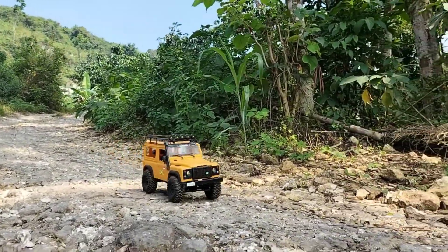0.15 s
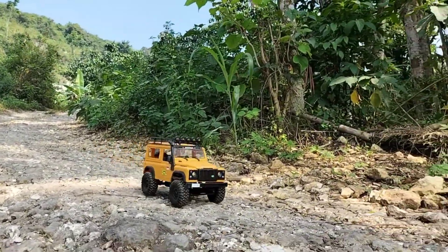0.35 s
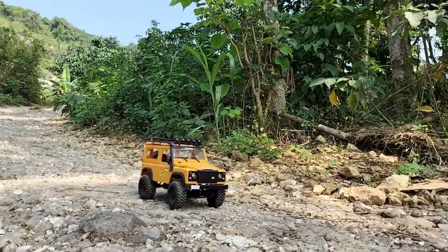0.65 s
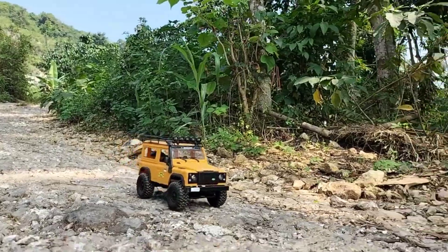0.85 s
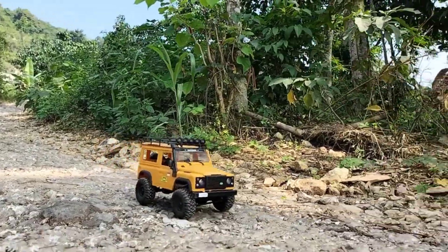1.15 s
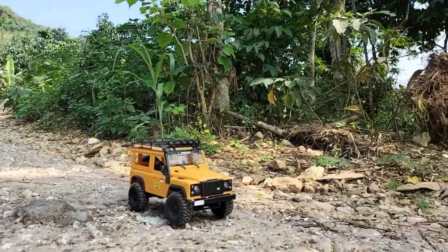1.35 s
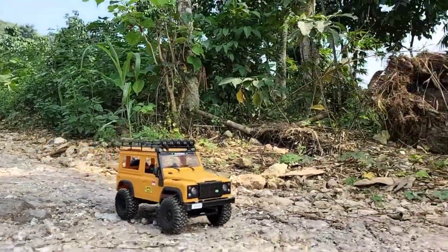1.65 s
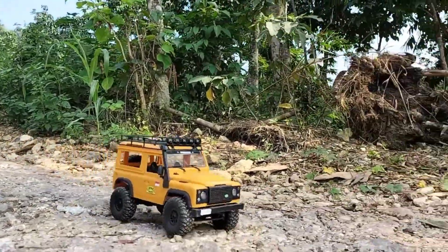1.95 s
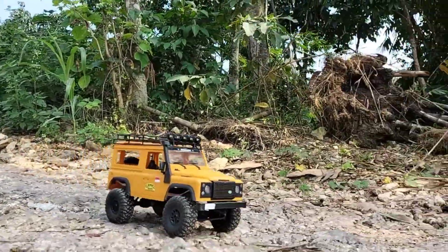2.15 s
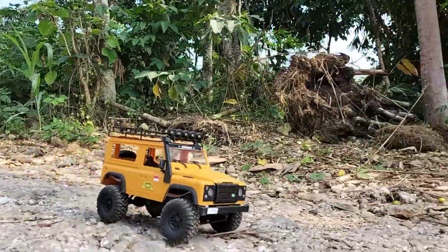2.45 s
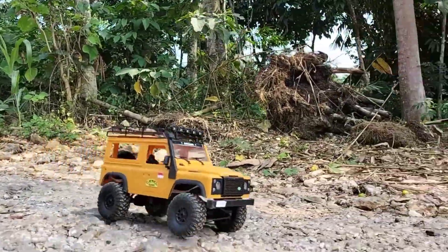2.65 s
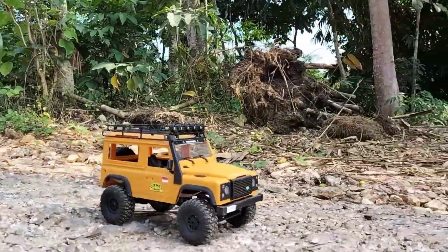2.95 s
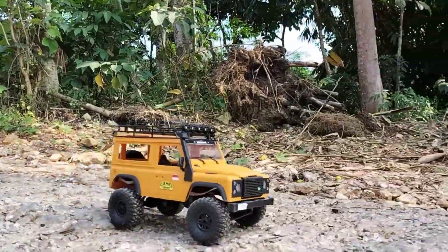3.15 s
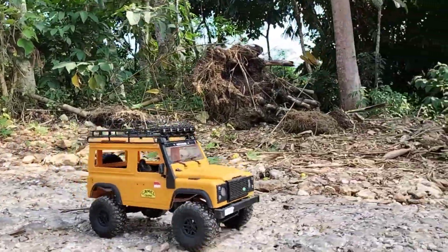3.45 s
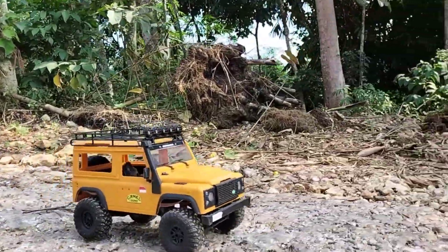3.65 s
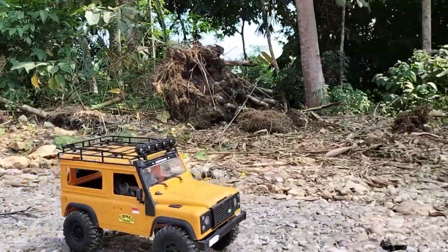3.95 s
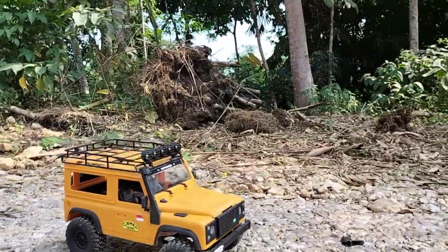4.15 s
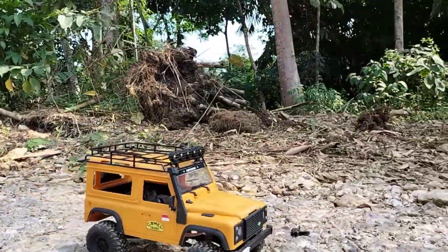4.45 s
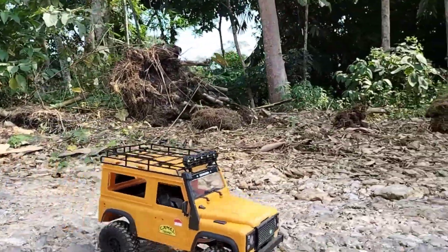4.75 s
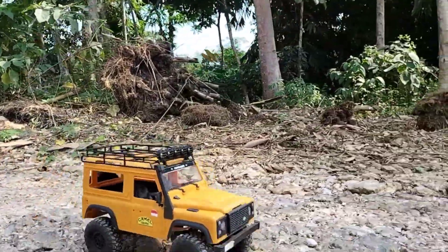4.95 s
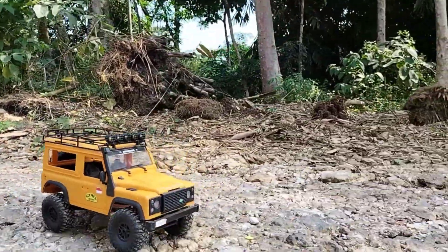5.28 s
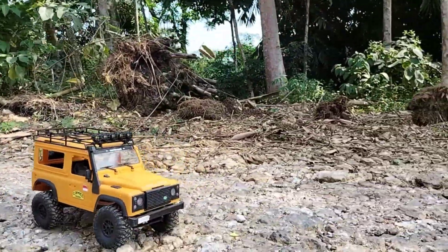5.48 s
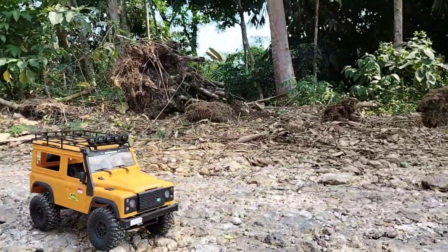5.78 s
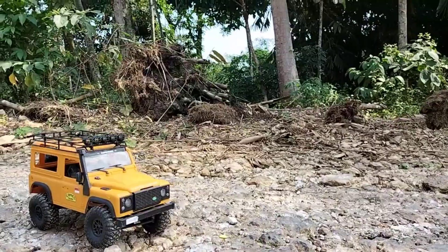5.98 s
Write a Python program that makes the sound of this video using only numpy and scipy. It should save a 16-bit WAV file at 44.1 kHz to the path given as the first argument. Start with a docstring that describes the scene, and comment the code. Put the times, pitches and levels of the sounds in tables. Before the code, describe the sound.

Open air on a rocky path, heard from about a metre away. A fast, high cricket trill runs throughout, rising and dipping in loudness and strongest around 2.7 s, joined by a thin cicada whistle in phrases, a fine buzzing shimmer and faint distant trills. From the start a small remote-control car crawls in short, uneven throttle bursts: dry gravel crunch, sandy grit and a light, high gear rasp. A cluster of hard stone snaps stands out at 0.5 s; smaller clicks follow around 2.5, 3.4 and 4.6 s, with dull pebble knocks and soft hollow body bumps between. The car is nearest around 4.1 s. A last burst of sharp clicks and crunch comes at 4.9-5.0 s, then the gears fall silent and gravel settles by 5.3 s. Insects, faint air, a tiny breeze puff and very faint pebble ticks remain until 6.1 s.

```python
"""A small remote-control car crawls over loose gravel and stops after five seconds.
Tyres: random grains, filtered into crunch and grit; gearbox: filtered grains that rasp with the throttle.
Struck stones, tipping pebbles and the hollow body ring as short decaying modes.
Behind: crickets built from pitch-bent wing strokes, a swaying cicada whistle, two far trills and faint
outdoor air with a hum, a flutter and puffs of breeze."""
import sys
import numpy as np
from scipy import signal
from scipy.fft import rfft, irfft, next_fast_len
from scipy.io import wavfile
from scipy.ndimage import uniform_filter1d, map_coordinates

SR = 44100
rng = np.random.default_rng(int(sys.argv[2]) if len(sys.argv) > 2 else 0)


def transcribe(signal):
    """Save signal, clipped to [-1, 1], as a 16-bit WAV file at the path in sys.argv[1]."""
    frames = np.atleast_2d(signal).T
    limited = np.clip(frames, -1, 1)
    pcm = np.round(limited * 32767).astype(np.int16)
    wavfile.write(sys.argv[1], SR, pcm)


N = 269892

# pushes of the throttle: start/s, end/s, effort/dB
THROTTLE_PUSHES = [(0.041, 0.108, -1.5), (.17, 0.198, -2.5), (.3, 0.576, -4), (0.664, 0.78, -4),
                   (0.809, 0.851, 1), (1.025, 1.053, 1), (1.093, 1.157, 1), (1.219, 1.45, -1.5),
                   (1.54, 1.598, 0), (1.681, 1.876, 0), (1.956, 2.277, 1), (2.331, 2.564, 0),
                   (2.63, 2.795, 0.5), (2.833, 2.934, -4), (3.036, 3.239, 0), (3.306, 3.328, 4.5),
                   (3.376, 3.417, -2), (3.616, 3.718, 0.5), (3.779, 3.9, -1.5), (4.049, 4.35, .5),
                   (4.4, 4.474, 2), (4.51, 4.621, 0), (4.779, 4.9, -0.5), (4.942, 5.003, 0.5)]
# loose gravel giving way under a tyre: middle/s, half length/s, crunch level/dB, grit level/dB
GRAVEL_SLIDES = [(0.254, 0.02, -54, -50), (0.332, 0.025, -50.5, -66), (0.513, 0.025, -46.5, -45.5),
                 (0.603, 0.026, -47.5, -58), (0.977, 0.027, -53, -53.5), (1.247, 0.026, -49, -57.5),
                 (1.337, 0.01, -43.5, -51), (1.476, 0.028, -49, -59), (2.46, 0.085, -50, -47),
                 (2.741, 0.015, -44.5, -48.5), (3.325, .015, -51, -44.5), (3.64, 0.046, -54, -48),
                 (4.172, 0.043, -53.5, -48.5), (4.285, 0.034, -52.5, -69), (4.581, 0.05, -49, -46.5),
                 (4.976, .035, -43.5, -52)]
# spectral shapes: f/Hz, relative density/dB
CRUNCH_SHAPE = [(41, -41), (70, -25), (124, -25.5), (246, -5), (329, -9), (365, -7), (435, -4), (674, -4.5),
                (943, 2.5), (1190, -5.5), (1820, -1.5), (2020, -12), (2300, -9.5), (2990, -16),
                (5060, -120)]
GRIT_SHAPE = [(1500, -39.5), (2100, 1), (2800, 1.5), (3300, 2.5), (4100, 1), (4600, 1.5), (5400, -3),
              (7000, -27), (9000, -36.5), (12000, -28), (15500, -35)]
GEAR_SHAPE = [(4800, -37), (5500, -8), (6000, 2.5), (6450, -5), (7100, 3.5), (7700, -2.5), (8300, -14.5),
              (9300, -29), (12000, -48), (15500, -44.5)]
AIR_SHAPE = [(25, -10), (60, -2.5), (150, 5.5), (300, 2), (600, -3.5), (1700, -7), (2100, -12.5),
             (2700, -7), (4300, -3.5), (5200, -30), (5900, -12.5), (6600, -8), (8000, -18.5), (9300, -30),
             (12000, -32), (15500, -41)]
# cricket loudness: t/s, level/dB
TRILL_LEVEL = [(0.0, -38.5), (0.63, -42.5), (0.66, -52), (0.78, -43.5), (0.87, -51.5), (1.03, -40.5),
               (1.15, -45), (1.26, -38), (1.8, -49.5), (2.09, -37.5), (2.29, -42), (2.38, -36.5),
               (2.7, -33), (2.8, -41.5), (3.21, -48.5), (3.52, -35.5), (3.58, -41.5), (4.04, -42),
               (4.09, -47.5), (4.28, -39.5), (4.38, -45), (6.1, -41.5)]
# cricket pitch: t/s, f/Hz
TRILL_PITCH_HZ = [(0, 4753), (.9, 4735), (1.38, 4836), (1.6, 4730), (2.2, 4686), (2.7, 4782), (3.1, 4732),
                  (3.8, 4800), (4.25, 4743), (4.9, 4680), (5.17, 4766), (6.12, 4748)]
# cicada phrases: start/s, end/s, whistle level/dB
CICADA_PHRASES = [(0.043, .15, -53), (0.267, 0.404, -44.5), (.55, 1.024, -54), (1.298, 2.05, -61),
                  (2.144, 2.962, -47.5), (3.08, 3.254, -54.5), (3.36, 3.813, -48.5), (3.943, 4.253, -53),
                  (4.34, 4.563, -48.5), (4.86, 5.062, -55.5), (5.443, 5.718, -49.5), (5.8, 5.9, -54.5),
                  (5.99, 6.12, -48)]
# faint hum: f/Hz, level/dB
HUM_TONES = [(603, -72.5), (940, -81), (1065, -81.5), (1470, -76.5)]
# breeze: middle/s, level/dB, half length/s
BREEZE_PUFFS = [(3.87, -65, 0.019), (4.024, -65, .03), (5.31, -68, 0.042), (5.464, -57, 0.012)]
# hard stone contacts: t/s, relative level/dB, low-mode boost/dB, high-mode boost/dB, pitch/Hz
STONE_CLICKS = [(0.1766,-38.5,-1.5,3.5,3450),(0.2984,-31.5,-3.5,-11,3550),(0.479,-27.5,-16,-20,3500),(0.489,-28,-9,-20,3350),(0.5003,-16.5,-5,-16,3470),(0.5058,-19,-16.5,-17,3370),(0.511,-8,-16,-22,3320),(0.528,-11.5,-9.5,-22,3400),(1.2309,-42,5,0.5,3440),(2.284,-42.5,-9,6,3400),(2.4394,-30,3.5,3.5,3450),(2.4635,-39,-10,-3,3560),(2.4846,-30,0,-2.5,3400),(2.5216,-22.5,-14,-7.5,3200),(2.539,-24.5,-5,-14.5,3600),(2.75,-25.5,-7,-4,3050),(3.2254,-34.5,-9,-10,3350),(3.297,-26,-10,2,3690),(3.3845,-25,-6,-9.5,3150),(3.6176,-26.5,0,-9.5,3430),(3.635,-35,4,-12,3380),(3.675,-31.5,1,-6.5,3320),(3.987,-38,-15,-10,3430),(4.213,-33.5,2,0,3600),(4.577,-27,-9,-15,3160),(4.585,-20.5,-7.5,-11,3490),(4.932,-27.5,-26,-18.5,3800),(4.944,-16,-16,-21,4160),(4.952,-27,-6,-14,3850),(4.997,-24,-11,-24.5,3980),(5.093,-38,-6,-9,3230)]
# modes of a stone of pitch 3400 Hz: f/Hz, relative level/dB, t60/s
STONE_MODES = [(1190, 6, 0.005), (1362, 3.5, 0.013), (1866, -4, 0.012), (2770, -2, 0.0092),
               (3210, 3, 0.0032), (3820, 3, 0.0072), (6060, 6.5, 0.0058), (6600, 0, 0.016),
               (7360, 0, 0.011)]
# hollow body bumping on its springs: t/s, relative level/dB, f/Hz
BODY_BUMPS = [(0.341,-41.5,490),(0.528,-40,220),(1.245,-38,480),(1.327,-41,417),(1.486,-40,392),(2.115,-41.5,440),(2.723,-42.5,420),(2.854,-40.5,420),(3.224,-38.5,436),(4.143,-40,488),(4.25,-41,520),(4.94,-35.5,376),(4.958,-40.5,435)]
# pebbles tipping under a tyre: t/s, relative level/dB, f/Hz
PEBBLE_KNOCKS = [(0.675,-33,1120),(0.778,-36,1310),(0.876,-30,1050),(1.24,-39,990),(1.584,-39.5,1480),(1.621,-39,1030),(1.707,-33,1030),(2.409,-38,910),(2.537,-37,1010),(3.384,-25,973),(3.389,-31.5,1090),(3.599,-33.5,1320),(3.617,-29,1100),(3.636,-31,1160),(4.467,-32,1000),(4.606,-33,1100),(4.629,-31.5,910),(4.952,-31,790),(4.961,-31,860),(5.212,-44.5,950),(5.694,-47,820)]

SPIN_UP_S, SPIN_DOWN_S, COAST_DB = 0.015, 0.032, -10.5  # motor takes the load, lets go, idles
STOP_S, GRAVEL_SETTLE_S, GEARS_OFF_S = 4.99, 0.35, 0.07  # gears fall silent sooner than gravel
NEAR_S, NEAR_M, SPEED_M_PER_S = 4.13, 1, 0.28  # closest approach to the listener
CRUNCH_DB, GRIT_DB, RASP_DB = -52, -51.5, -50  # at 0 dB effort and closest approach
CRUNCH_DB_PER_EFFORT_DB, GRIT_DB_PER_EFFORT_DB = 0.45, 0.72
PATCH_SAMPLES = 768
STROKES_PER_S, SLOWING_PER_S2 = 49.6, 0.42  # wings slowly tire
WING_HZ = 4752
WHISTLE_RISE_S, WHISTLE_FALL_S, WHISTLE_REST_DB = 0.1, 0.096, -67.5  # rest: soft held note
SWAY_HZ, SWAY_DEPTH_HZ, SWAY_PERIOD_S, SWAY_TOP_S = 3543, 19, 1.46, 1.2
SHIMMER_DB, SHIMMER_FADE_DB_PER_S = -64, 0.75  # level at t = 0
TOP_HZ = 15480


def amp(db):
    """Decibels to gain."""
    return 10 ** (np.asarray(db) / 20)


def unit(x):
    """Scale to rms 1."""
    return x / np.sqrt(np.mean(x ** 2) + 1e-20)


def curve(rows):
    """Interpolate (t/s, value) rows to one value per sample."""
    s, values = np.transpose(rows)
    return np.interp(np.arange(N) / SR, s, values)


def wobble(rate):
    """Smooth random curve, rate knots a second."""
    knots = rng.standard_normal(int(N * rate / SR) + 4)
    return map_coordinates(knots, [np.arange(N) * rate / SR])


def turns(hz):
    """Cycles completed at a steady or moving frequency."""
    return np.cumsum(hz * np.ones(N)) / SR


def held(start, end, rise, fall):
    """Rise to 1 by start, hold until end, fall back to 0."""
    end = max(start, end)
    return np.interp(np.arange(N) / SR, [start - rise, start, end, end + fall], [0, 1, 1, 0])


def swell(middle, half_length):
    """Gaussian rise and fall; half_length is its standard deviation."""
    return np.exp(-0.5 * ((np.arange(N) / SR - middle) / half_length) ** 2)


def band_noise(count, low_hz, high_hz):
    """White noise through a second-order-prototype band-pass."""
    return signal.lfilter(*signal.butter(2, [low_hz, high_hz], "band", fs=SR), rng.standard_normal(count))


def coloured(x, points):
    """Filter x causally (minimum phase) to a (f/Hz, dB) shape, at rms 1."""
    m = 2 * next_fast_len(N // 2 + SR // 4)
    f, db = np.transpose(points)
    shape_db = np.interp(np.log(np.fft.rfftfreq(m, 1 / SR) + 1), np.log(f), db)
    # fold the cepstrum to positive time
    cepstrum = irfft(np.log(amp(shape_db)), m)
    cepstrum[1:m // 2] *= 2
    cepstrum[m // 2 + 1:] = 0
    response = np.exp(rfft(cepstrum))
    return unit(irfft(rfft(x, m) * response, m)[:N])


def grains(rate, spread_db):
    """Random tiny impacts of uneven size, rate a second, at rms 1."""
    size = amp(spread_db * np.clip(rng.standard_normal(N), -2, 2))
    sign = rng.choice([-1, 1], N)
    return unit(size * sign * (rng.random(N) < rate / SR))


def patchy(x, depth_db):
    """Every few milliseconds other stones or teeth ring, each with its own resonances."""
    z = signal.stft(x, nperseg=PATCH_SAMPLES)[2]
    field = uniform_filter1d(rng.standard_normal(z.shape), 3, 0)
    field = uniform_filter1d(field, 2, 1)
    gain = amp(depth_db * np.clip(unit(field), -2, 2))
    return signal.istft(z * gain, nperseg=PATCH_SAMPLES)[1][:N]


def add(track, s, sound):
    """Mix a sound in at time s."""
    part = track[max(round(s * SR), 0):][:len(sound)]
    part += sound[:len(part)]


def drive():
    """Gains of crunch, grit and rasp: throttle and distance set all three; slides add to crunch and grit."""
    t = np.arange(N) / SR
    pushes = [amp(db) * held(start, end, SPIN_UP_S, SPIN_DOWN_S) for start, end, db in THROTTLE_PUSHES]
    effort = np.maximum(np.max(pushes, axis=0), amp(COAST_DB))
    nearness = NEAR_M / np.hypot(NEAR_M, SPEED_M_PER_S * (t - NEAR_S))
    rolling = nearness * held(0, STOP_S, SPIN_UP_S, GRAVEL_SETTLE_S)
    crunch_slides = sum(amp(db) * swell(s, length) for s, length, db, _ in GRAVEL_SLIDES)
    grit_slides = sum(amp(db) * swell(s, length) for s, length, _, db in GRAVEL_SLIDES)
    crunch = amp(CRUNCH_DB) * rolling * effort ** CRUNCH_DB_PER_EFFORT_DB
    grit = amp(GRIT_DB) * rolling * effort ** GRIT_DB_PER_EFFORT_DB
    rasp = amp(RASP_DB) * rolling * effort * held(0, STOP_S, SPIN_UP_S, GEARS_OFF_S)
    return np.hypot(crunch, crunch_slides), np.hypot(grit, grit_slides), rasp


def gearbox():
    """Tooth impacts, filtered to a high rasp, vary with the motor load."""
    teeth = grains(rate=6000, spread_db=4)
    load = amp(2 * wobble(110) + 1.4 * wobble(35))
    return coloured(patchy(teeth * load, depth_db=8.0), GEAR_SHAPE)


def tyres_and_gears():
    """Tread blocks crush grit in clumps; the gearbox rasps as the motor takes the load."""
    crunch_gain, grit_gain, rasp_gain = drive()
    clumps, ground = wobble(70), wobble(21.907)
    shared = grains(rate=500, spread_db=3)  # larger stones sound in both layers
    sand = grains(rate=5000, spread_db=3)
    gravel = shared + 0.96 * grains(rate=2500, spread_db=1.5)
    crunch = coloured(patchy(gravel * amp(1.32 * clumps + ground), depth_db=4.5), CRUNCH_SHAPE)
    fine = (0.31 * shared + sand) * amp(2.6 * clumps + 0.62 * ground)
    grit = coloured(patchy(fine, depth_db=5.0), GRIT_SHAPE)
    return crunch_gain * crunch + grit_gain * grit + rasp_gain * gearbox()


def cricket(pitch, rate, bend_hz, echo):
    """Each wing stroke swells as its pitch climbs and drops back; echoes from the bushes blur strokes."""
    u = turns(rate) % 1 - 0.5  # place within the stroke
    carrier = turns(WING_HZ + 6 * wobble(6) + 10 * wobble(130)) + (pitch - WING_HZ) * u / rate
    bend = np.sin(2 * np.pi * u - 0.2) + 0.15 * np.sin(4 * np.pi * u - 1.4)
    stroke = (0.36 + np.cos(np.pi * u)) * amp(0.6 * wobble(40))
    call = stroke * np.sin(2 * np.pi * carrier + bend_hz / rate * bend)
    delays_s = rng.uniform(0.0043, 0.06, 6)
    echoes = sum(wobble(3.22) * np.roll(call, round(delay * SR)) for delay in delays_s)
    trill = call + echo * echoes
    # level out the slow loudness
    return trill / np.sqrt(np.abs(uniform_filter1d(trill ** 2, size=4096)) + 1e-9)


def crickets():
    """A near cricket leads; a fainter one trills slightly out of step; both are band-passed."""
    pitch = curve(TRILL_PITCH_HZ)
    rate = STROKES_PER_S - SLOWING_PER_S2 * np.arange(N) / SR
    near = cricket(pitch, rate, bend_hz=66, echo=0.15)
    far = cricket(pitch - 15, rate - 2 + wobble(2), bend_hz=70, echo=0.4)
    band = signal.butter(3, [4590, 4950], "band", fs=SR, output="sos")
    return amp(curve(TRILL_LEVEL)) * unit(signal.sosfilt(band, near + 0.22 * far))


def cicada():
    """Nearly pure whistle in phrases, swaying in pitch; its fourth harmonic shimmers with a fast buzz."""
    t = np.arange(N) / SR
    phrases = np.max([amp(db) * held(start, end, WHISTLE_RISE_S, WHISTLE_FALL_S)
                      for start, end, db in CICADA_PHRASES], axis=0)
    pitch = SWAY_HZ + SWAY_DEPTH_HZ * np.cos(2 * np.pi * (t - SWAY_TOP_S) / SWAY_PERIOD_S)
    phase = 2 * np.pi * turns(pitch + 2 * wobble(60))
    level = np.hypot(phrases, amp(WHISTLE_REST_DB))
    whistle = level * amp(wobble(6.9)) * (1 + 0.12 * wobble(110)) * np.sin(phase)
    overtones = amp(-69.5) * np.sin(2 * phase) + amp(-89) * np.sin(3 * phase)
    overtones *= amp(2.8 * wobble(10))
    buzz = 2 * np.pi * turns(160 + 4 * wobble(20))
    pulsing = 1 + 0.21 * np.cos(buzz) + 0.3 * np.cos(2 * buzz) + 0.25 * wobble(500)
    shimmer = pulsing * np.sin(4 * phase + 0.65 * np.sin(2 * buzz) + 0.3 * wobble(600))
    flicker = amp(2 * wobble(9) + 2.6 * wobble(36))
    receding = amp(SHIMMER_DB - SHIMMER_FADE_DB_PER_S * t)
    return whistle + overtones + receding * flicker * unit(shimmer)


def far_trill(hz, rate, db):
    """Distant insect: a tone of unsteady pitch, pulsed by uneven wing strokes."""
    stroke = np.abs(np.sin(np.pi * turns(rate + 0.5 * wobble(2.7))))
    tone = np.sin(2 * np.pi * turns(hz + 28 * wobble(160)))
    return amp(db) * unit(stroke * amp(2.9 * wobble(40)) * tone)


def air():
    """Filtered-noise hush, low flutter of filtered ticks, hum of wavering tones, low-noise breeze puffs."""
    t = np.arange(N) / SR
    hush = amp(-66.5) * coloured(rng.standard_normal(N), AIR_SHAPE) * amp(wobble(3.06))
    ticks = np.diff(np.floor(turns(67 + 0.1 * wobble(3.9))), prepend=0)
    flutter_shape = [(100, -28.0), (500, -7.5), (1800, -4.0), (2100, -17.0), (5000, -42.0)]
    flutter = amp(-73.5) * coloured(ticks, flutter_shape)
    hum = sum(amp(db + 2 * wobble(3.53)) * np.sin(2 * np.pi * turns(hz + 4 * wobble(30)))
              for hz, db in HUM_TONES)
    hum *= np.interp(t, [5.3, 5.8], [0.4, 1])  # swells towards the end
    puffs = sum(amp(db) * swell(s, length) for s, db, length in BREEZE_PUFFS)
    breeze_shape = [(20, -18), (45, 1), (100, 7), (170, -15), (600, -61)]
    return hush + flutter + hum + puffs * coloured(rng.standard_normal(N), breeze_shape)


def stones():
    """A hard contact rings a stone for milliseconds; it chatters on its neighbours before and after."""
    out, t = np.zeros(N), np.arange(SR // 25) / SR
    hz, mode_db, t60 = np.transpose(STONE_MODES)[:, :, None]
    for s, db, low_db, high_db, pitch in STONE_CLICKS:
        level_chance, pitch_chance = rng.standard_normal((2, len(STONE_MODES), 1))
        colour_db = np.interp(hz, [1800, 2700, 4200, 5600], [low_db, 0, 0, high_db])
        tuned = hz * pitch / 3400 * (1 + 0.025 * pitch_chance)
        decay = amp(mode_db + colour_db + 1.5 * level_chance - 60 * t / t60)
        ring = decay * np.sin(2 * np.pi * tuned * t)
        ring[1::2] *= -1  # neighbouring modes swing in opposite directions
        scrape = band_noise(len(t), 500, 5000) * amp(-60 * t / 0.02)
        click = amp(db - 7.0) * (ring.sum(0) + 0.07 * scrape)
        add(out, s, click)
        for lag, strength in rng.standard_normal(size=(4, 2)):
            add(out, s + 0.009 * lag, amp(-21) * strength * click)
    return out


def body():
    """A wheel drops off a stone and the plastic shell gives a short, hollow thud."""
    out, t = np.zeros(N), np.arange(SR // 10) / SR
    for s, db, hz in BODY_BUMPS:
        phase = 2 * np.pi * hz * t
        shell = np.sin(phase) + 0.27 * np.sin(0.5 * phase) - 0.5 * np.sin(2.1 * phase)
        envelope = amp(-60 * t / 0.066) * (1 - np.exp(-t / 0.0018))
        add(out, s, amp(db - 1.5) * shell * envelope)
    return out


def pebbles():
    """Rubber tips a pebble back on to the ground: dull two-mode knock, trace of scraping."""
    out, t = np.zeros(N), np.arange(SR // 16) / SR
    for s, db, hz in PEBBLE_KNOCKS:
        knock = np.sin(2 * np.pi * hz * t) * amp(-60 * t / 0.021)
        overtone = 0.88 * np.sin(2 * np.pi * 1.435 * hz * t) * amp(-60 * t / 0.0058)
        scrape = 0.34 * band_noise(len(t), 400, 3000) * amp(-60 * t / 0.029)
        add(out, s, amp(db - 1.0) * (knock - overtone + scrape))
    return out


def surroundings(x):
    """Ground and bushes return a short scatter: convolution with decaying noise."""
    t = np.arange(SR // 4) / SR
    tail = rng.standard_normal(len(t)) * amp(-60 * t / 0.2) * (1 - np.exp(-t / 0.003))
    return signal.fftconvolve(x, tail / np.linalg.norm(tail))[:N]


def scene():
    """The car in front, the insects behind."""
    high_pass = signal.butter(2, 170, "high", fs=SR)  # small things radiate no bass
    hits = signal.lfilter(*high_pass, stones() + body() + pebbles())
    far_insects = far_trill(hz=5670, rate=51, db=-68.5) + far_trill(hz=3916, rate=54, db=-67.5)
    insects = crickets() + cicada() + far_insects
    mix = tyres_and_gears() + hits + amp(-15.5) * surroundings(hits) + insects + air()
    return mix[None]


def record(dry):
    """Remove everything from the band limit TOP_HZ up."""
    m = next_fast_len(N + SR // 2)
    passed = np.fft.rfftfreq(m, 1 / SR) < TOP_HZ
    return irfft(rfft(dry, m) * passed, m)[..., :N]


dry = scene()
out = record(dry)
transcribe(out)
```